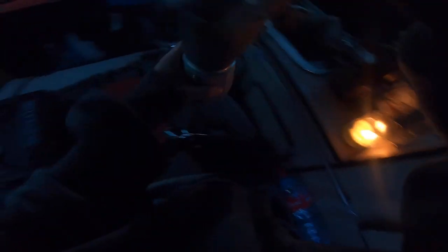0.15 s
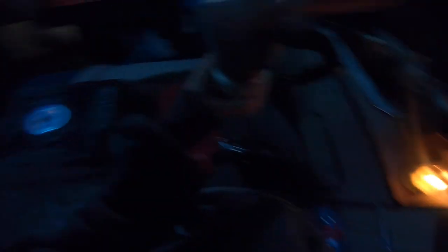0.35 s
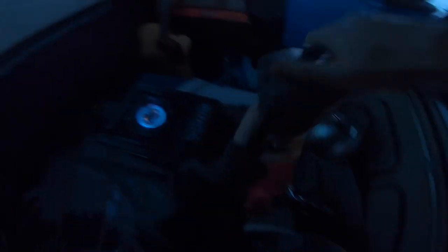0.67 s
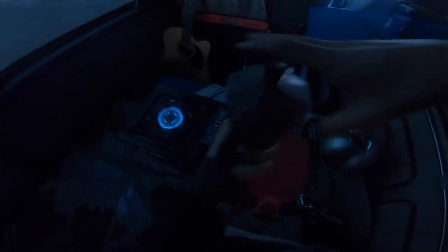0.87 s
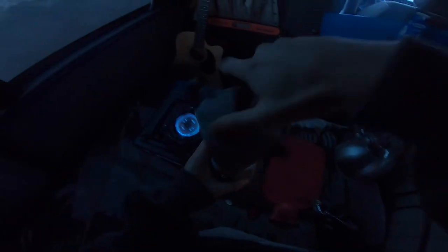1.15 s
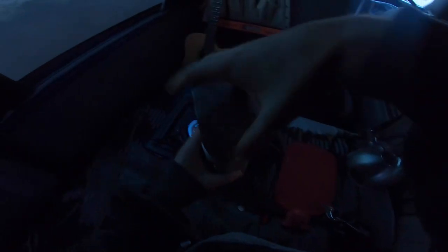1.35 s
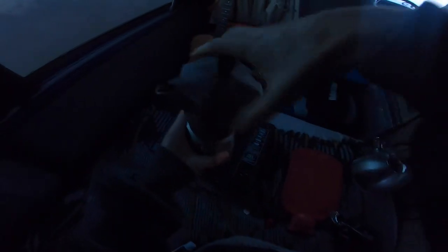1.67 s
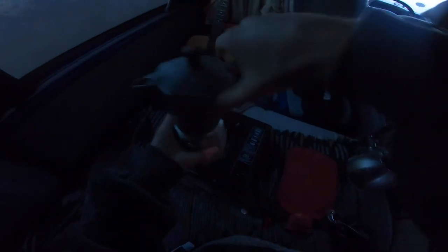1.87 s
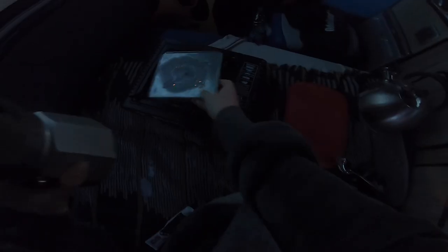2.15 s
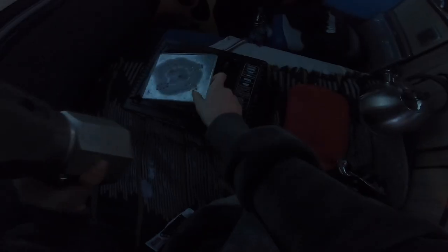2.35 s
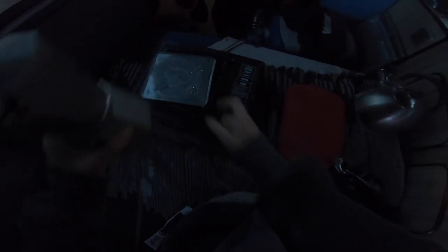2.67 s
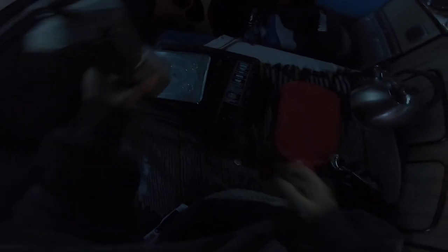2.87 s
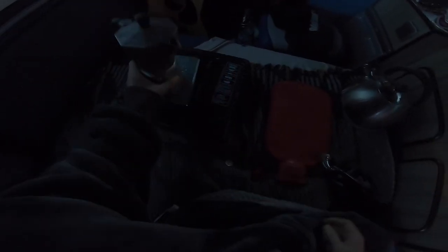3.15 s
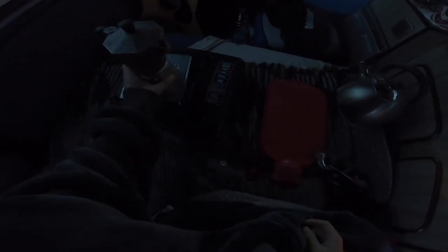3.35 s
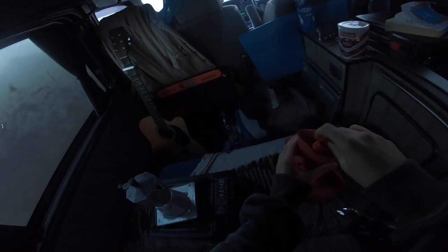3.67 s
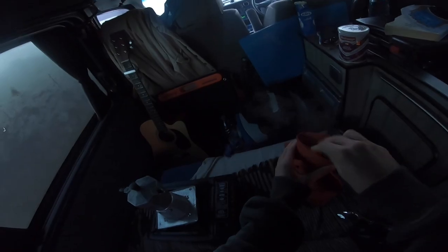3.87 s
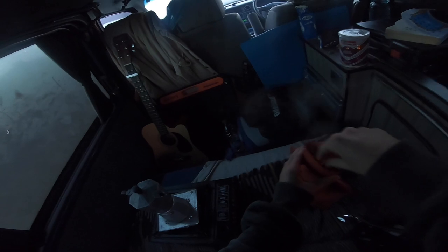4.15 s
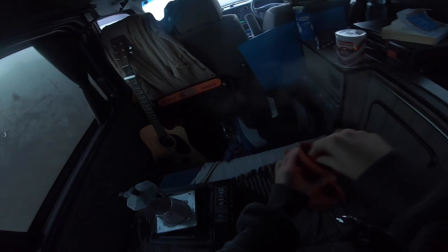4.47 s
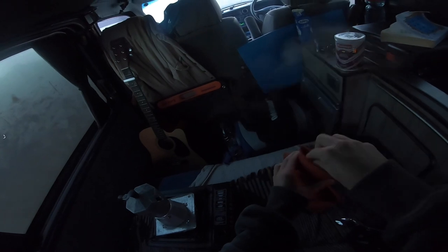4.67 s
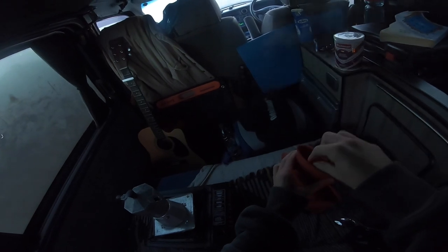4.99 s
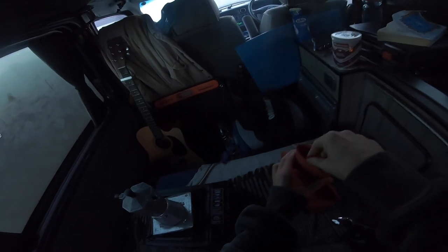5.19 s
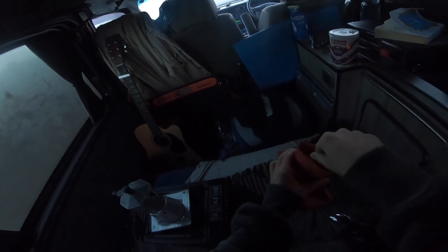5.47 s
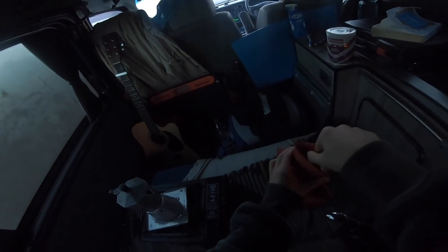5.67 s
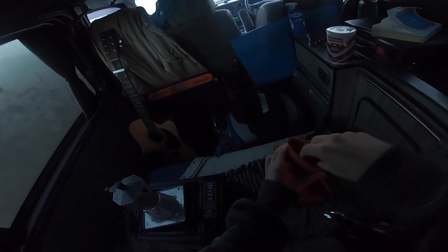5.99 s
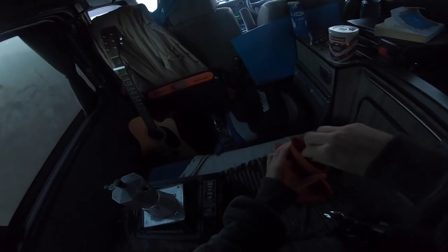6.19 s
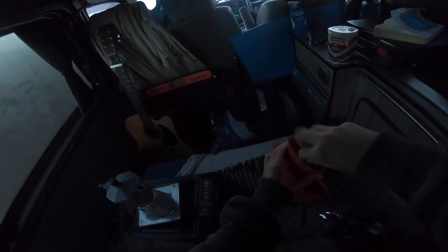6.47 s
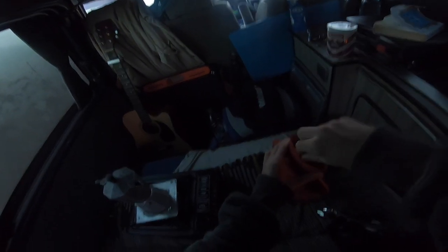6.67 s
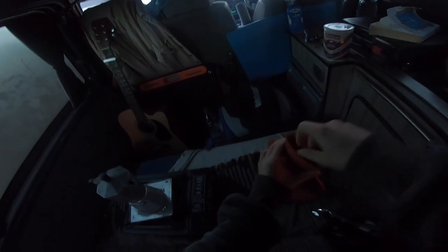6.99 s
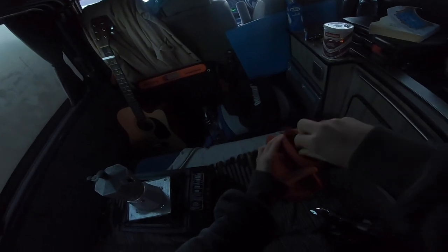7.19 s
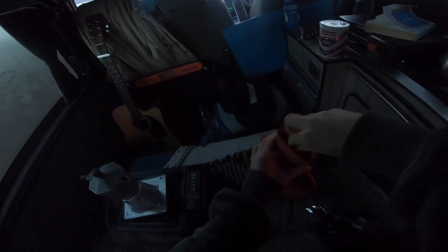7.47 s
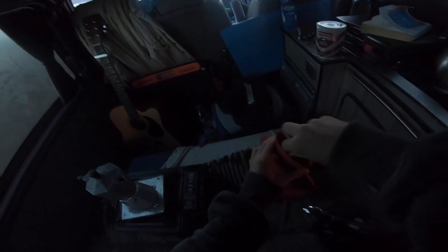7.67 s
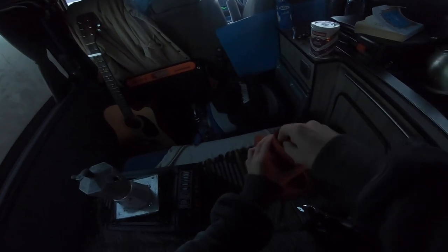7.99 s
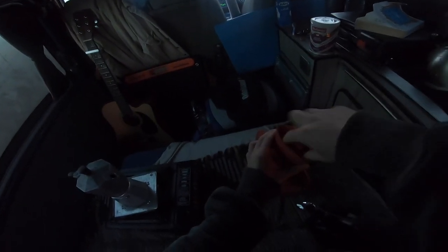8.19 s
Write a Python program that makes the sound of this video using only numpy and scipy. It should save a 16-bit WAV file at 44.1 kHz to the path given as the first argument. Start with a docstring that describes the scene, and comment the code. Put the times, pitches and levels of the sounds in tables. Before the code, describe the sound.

Sharp little metal knocks and gritty thread turns come first, with gas hissing faintly and steam whistling thinly for moments. Then a loud scrape of thin sheet metal leaves a shimmering ring, and a pot clunks down onto it with a short scrape. Abruptly it is much quieter: a stopper turned into a rubber bottle ticks irregularly, fingers rub softly, cabin hum beneath. Near wearable stereo microphone, small deadened van interior, almost no echo.

```python
"""Coffee pot, stove and hot-water bottle in a van

Inside a small van a metal coffee pot is screwed together beside a hissing gas ring with a thin whistle of steam.
A sheet-metal stove is dragged and rings, and the pot is set down on it; later a plastic stopper is turned,
ticking, into a rubber hot-water bottle, over the quiet hum of the cabin. Clicks and frictional grains force
modal resonators and coloured filters; flame and hum are filtered noise, the whistle a sine of varying pitch.
"""
import sys
import numpy as np
from scipy import signal
from scipy.fft import rfft, irfft
from scipy.io import wavfile

SR = 44100
rng = np.random.default_rng(int(sys.argv[2]) if len(sys.argv) > 2 else 0)


def to_wav(sig):
    """Store sig (one row per channel, or 1-D mono) as 16-bit WAV at the path in sys.argv[1].

    Samples outside -1..1 are clipped; the rate is SR.
    """
    pcm = np.clip(np.atleast_2d(sig), -1, 1) * 32767
    pcm = np.round(pcm).astype(np.int16)
    wavfile.write(sys.argv[1], SR, pcm.T)  # frames by channels


def volts_from_db(level):
    """Convert decibel levels to linear amplitude ratios."""
    exponent = np.asarray(level, float) / 20
    return 10 ** exponent


N = 367787   # length [samples]
BOTTLE_FROM_S = 3.7   # the flame stops and the bottle begins

# vibration modes of the pot wall: (frequency [Hz], coupling [dB], t60 [s])
POT_MODES = [(1728, -14, 0.035), (2137, -3, 0.057), (3165, 0, 0.039), (3483, -22, 0.065), (3693, -18, 0.08),
             (4441, -21, 0.045), (4743, -20, 0.047), (5448, -25, 0.05), (5911, -31, 0.089),
             (6901, -27, 0.04), (7784, -36, 0.068)]
# spectral envelope of the stove's contacts and sheet: (frequency [Hz], gain [dB])
STOVE_COLOUR = [(290, -44.5), (500, -8.5), (657, -18), (1010, -3.5), (1170, -18.5), (1310, -1.5),
                (1650, -6.5), (1880, 3), (2200, -4), (3190, 0), (4250, -8), (9650, -21.5), (12000, -35.5),
                (15500, -46.5)]


def rms_one(x):
    """Normalization: mean power becomes 1."""
    return x / np.sqrt(np.mean(x ** 2) + 1e-20)


def in_time(rows):
    """Linear interpolation: the columns of a curve at every sample."""
    s, *columns = np.transpose(rows)
    return [np.interp(np.arange(N) / SR, s, c) for c in columns]


def cut(x, hz, kind):
    """Butterworth filtering of order 2: a maximally flat passband."""
    return signal.sosfilt(signal.butter(2, np.clip(hz, 10, 19000), kind, fs=SR, output="sos"), x)


def colour(x, spectrum, size=4096):
    """Minimum-phase filtering: white noise of rms 1 leaves with rms 1 between 1 and 5 kHz."""
    hz = np.arange(size // 2 + 1) * SR / size
    corner_hz, gain_db = np.transpose(spectrum)
    log_gain = np.log(volts_from_db(np.interp(np.log(hz + 1), np.log(corner_hz), gain_db)))
    # folding the cepstrum onto positive times makes the response causal
    cepstrum = irfft(log_gain)
    cepstrum[1:size // 2] *= 2
    cepstrum[size // 2 + 1:] = 0
    response = np.exp(rfft(cepstrum))
    power = np.mean(np.abs(response) ** 2 * (hz > 1000) * (hz < 5000))
    impulse = irfft(response)[None] / np.sqrt(power)
    return signal.oaconvolve(x, impulse, axes=1)[:, :N]


def drift(rate):
    """Low-passed random fluctuation of rms 1, with its cutoff at the rate [Hz]."""
    return rms_one(cut(rng.standard_normal(N + SR), rate, "low")[SR:])


def wide_noise(alike):
    """Partial coherence: white noise whose two sides correlate by the given amount."""
    mid, side = rng.standard_normal((2, N))
    alike = np.clip(alike, 0, 1)
    return np.sqrt((1 + alike) / 2) * mid + np.sqrt((1 - alike) / 2) * side * np.array([[1], [-1]])


def shaking():
    """Transient envelope: each bump swells exponentially, holds and dies over a faint floor."""
    # bumps of the van floor: (time of peak [s], hold [s], level [dB])
    bump_rows = [(0.371, 0, -69), (.83, 0.057, -65), (1.21, 0, -81), (1.55, 0.04, -77),
                 (1.94, 0.049, -55.5), (2.29, .04, -45.5), (2.56, 0.017, -42.5), (3.34, 0.09, -43),
                 (3.58, 0.0017, -43.5), (4.39, 0, -68), (4.53, 0, -66), (5.18, 0.0077, -73),
                 (5.53, 0.0031, -72.5), (6.74, 0, -68), (8.04, 0.019, -53)]
    rise_db_per_s, fall_db_per_s, rest_db = 329, 280, -98.5
    t = np.arange(N) / SR
    level = volts_from_db(rest_db)
    for s, held, db in bump_rows:
        rise = rise_db_per_s * np.maximum(s - t, 0)
        fall = fall_db_per_s * np.maximum(t - s - held, 0)
        level = level + volts_from_db(db - rise - fall)
    return level


def cabin():
    """Filtered noise: hum with narrow bands, low bumps through the floor and a drone from outside."""
    # spectral envelope of the hum: (frequency [Hz], gain [dB])
    hum_colour = [(15, -33.5), (25, -1.5), (60, 0.5), (96, -16.5), (155, 2.5), (301, 0), (554, -19.5),
                  (761, -5.5), (1050, -20.5), (1970, -6), (2500, -20.5), (3930, -10), (6670, -21.5),
                  (9410, -19), (14000, -45)]
    # narrow bands in the hum: (centre [Hz], width [Hz], level among the bands [dB])
    hum_bands = [(746, 90, -3), (1560, 39, -1.5), (1810, 260, 3), (2980, 38, -4.5), (3300, 170, -1.5),
                 (3960, 71, -4.5)]
    hum_db, drone_hz, drone_db = -68.5, 46, -78
    hum = rms_one(colour(wide_noise(alike=0.27), hum_colour))
    noise = wide_noise(alike=0.44)
    bands = sum(volts_from_db(db) * rms_one(cut(noise, [hz - width / 2, hz + width / 2], "band"))
                for hz, width, db in hum_bands)
    hum = hum + volts_from_db(-12 + 3.0 * drift(18)) * bands
    bumps = rms_one(cut(cut(wide_noise(alike=0.84), [48, 95], "band"), [40, 115], "band"))
    drone = rms_one(cut(wide_noise(alike=.9), [drone_hz - 3, drone_hz + 3], "band"))
    return volts_from_db(hum_db) * hum + shaking() * bumps + volts_from_db(drone_db) * drone


def flame():
    """Broadband turbulence noise: the gas hisses with a fluctuating level until the bottle begins."""
    # mean level of the hiss: (time [s], level [dB])
    flame_level = [(0, -56), (.2, -58.5), (.5, -59.5), (.8, -66), (.95, -69.5), (1.4, -65.5), (1.5, -69.5),
                   (1.8, -68.5), (2.1, -58.5), (2.25, -58), (3.2, -66), (3.6, -60.5)]
    # spectral envelope: (frequency [Hz], gain [dB])
    flame_colour = [(90, -42), (140, -12), (175, -13), (300, 0), (565, -11.5), (1080, -10), (2350, -13),
                    (4070, -16.5), (5310, -20.5), (6120, -17), (7060, -32.5), (8480, -31), (13000, -73.5)]
    burning = np.arange(N) < BOTTLE_FROM_S * SR
    level = volts_from_db(in_time(flame_level)[0] + 2.8 * drift(8))
    return level * burning * colour(wide_noise(alike=0.31), flame_colour)


def whistle():
    """Frequency and amplitude modulation: a thin sine of steam wavers in pitch and strength."""
    # puffs of steam: (start [s], end [s], mean level [dB])
    puff_rows = [(0, .18, -63), (.47, .78, -66)]
    # mean pitch: (time [s], frequency [Hz])
    pitch_curve = [(0, 6450), (.04, 6400), (.075, 6050), (.11, 5940), (.14, 6620), (.18, 6300), (.49, 6070),
                   (.55, 5900), (.65, 5930), (.78, 5870)]
    fade_s = 0.026
    t = np.arange(N) / SR
    puffs = np.zeros(N)
    for start, end, db in puff_rows:
        since_start = t - start + (start == 0)   # a puff from time zero is already full
        puffs += volts_from_db(db) * np.clip(np.minimum(since_start, end - t) / fade_s, 0, 1)
    hz = in_time(pitch_curve)[0] + 130 * drift(200)
    phase = 2 * np.pi * np.cumsum(hz) / SR
    return puffs * volts_from_db(3.0 * drift(15) + 3.0 * drift(80)) * np.sin(phase)


def ring(force, modes, fickle_db=0.0):
    """Modal superposition: a force drives damped resonators, each with a randomly varying coupling."""
    out, busy = np.zeros_like(force), np.flatnonzero(np.any(force != 0, axis=0))
    here = slice(busy[0], busy[-1] + SR // 2)
    force = force[:, here]
    length = force.shape[1]
    for hz, level_db, t60 in modes:
        r, w = volts_from_db(-60 / (t60 * SR)), 2 * np.pi * hz / SR   # pole radius and angle
        # the contact point wanders: a new coupling every 1024 samples
        caught = volts_from_db(fickle_db * rng.normal(0, 1, length // 1024 + 1))
        caught = np.repeat(caught, 1024)[:length]
        side_db = rng.normal(0, 1) * np.array([[1], [-1]])
        driven = volts_from_db(level_db + side_db) * caught * force
        out[:, here] += signal.lfilter([0, np.sin(w)], [1, -2 * r * np.cos(w), r * r], driven + 1e-18)
    return out


def blows(rows, t60, rattle_db):
    """Impulsive excitation (main, hollow, bright, ringing): a click, then an exponentially dying rattle."""
    # rows: (time [s], click [dB], hollow, bright and ringing drive re click [dB], left minus right [dB])
    forces, t = np.zeros((4, 2, N + SR)), np.arange(SR // 8) / SR
    for s, peak_db, *parts_db, pan_db in rows:
        blow = volts_from_db(rattle_db - 60 * t / t60) * rng.standard_normal(len(t))
        blow[0] = 1
        sides = volts_from_db(peak_db + pan_db * np.array([[.5], [-.5]]))
        parts = volts_from_db(np.array([0, *parts_db]))[:, None, None]
        start = round(s * SR)
        forces[:, :, start:start + len(t)] += parts * sides * blow
    return forces[:, :, :N]


def strokes(gains, per_s, spread_db, pan_db, slips_per_s, slip_db):
    """Stick-slip friction (main, hollow, bright): dense grains, with slips that the bright part ignores."""
    sizes = volts_from_db(spread_db * np.minimum(rng.exponential(1, N), 5)) * rng.choice([-1, 1], N)
    grains = sizes * (rng.random(N) < per_s * volts_from_db(3.0 * drift(40)) / SR)
    slips = (rng.random(N) < slips_per_s / SR) * rng.random(N)
    slips = signal.lfilter([1], [1, -np.exp(-1 / (0.0032 * SR))], slips)   # time constant 3.2 ms
    jerky = rms_one(grains * (1 + volts_from_db(slip_db) * slips))
    parts = gains * [jerky, jerky, rms_one(grains)]
    return parts[:, None] * volts_from_db(pan_db * np.array([[.5], [-.5]]))


def spread_out(x, share):
    """Multipath decorrelation: a share of each side arrives over two later paths of its own."""
    share = np.clip(share, 0, 1)
    late = np.array([np.roll(x[0], 23), -np.roll(x[1], 41)])   # delays in samples
    later = np.array([-np.roll(x[0], 67), np.roll(x[1], 97)])
    return np.sqrt(1 - share) * x + np.sqrt(share / 2) * (late + later)


def body(forces, spectrum, hollow, hollow_db, bright_db):
    """Source-filter radiation: crack and hiss take the object's colour, a cavity resonates as the thud."""
    main, low, bright = forces[:3]
    bright = volts_from_db(bright_db - 8) * spread_out(bright, share=0.81)
    # the minus keeps both sides of the order-2 crossover in phase
    crack = cut(main, 5000, "low") - cut(bright, 5000, "high")
    thud = ring(cut(low, 830, "low"), hollow, fickle_db=3.5)
    for _ in range(3):
        thud = cut(thud, 140, "high")
    return colour(crack, spectrum) + volts_from_db(hollow_db) * thud


def twisting():
    """Friction envelope: each turn of the thread swells, holds and eases; thud and hiss follow the rub."""
    # turns: (start [s], full [s], easing [s], end [s], full rub before the mix [dB])
    turns = [(0.178, 0.255, .325, 0.51, -41), (0.591, 0.736, 0.73, 0.81, -35.5),
             (.82, .835, 0.85, .875, -56.5), (1.073, 1.158, 1.244, 1.35, -39.5),
             (1.519, 1.553, 1.636, 1.673, -37)]
    rise_db, fall_db = 31.5, 31   # below full at start and end
    hollow_db, bright_db, bright_follows = -2.5, -13.5, .7   # parts re full rub; share of the swing
    gains, t, lumps = np.zeros((3, N)), np.arange(N) / SR, 1.3 * drift(25)
    for *times, full_db in turns:
        swing = np.interp(t, times, [-rise_db, 0, 0, -fall_db])
        parts_db = np.array([swing, swing + hollow_db + lumps, bright_follows * swing + bright_db])
        gains += (t >= times[0]) * (t < times[-1]) * volts_from_db(full_db + parts_db)
    return gains


def pot():
    """Impact and friction excitation: the halves knock, the thread is twisted and the wall rings briefly."""
    # knocks before the mix: (time [s], click [dB], hollow part re click [dB], bright part re click [dB],
    # left minus right [dB])
    pot_knocks = [(0.0483, -49, 10, -4, -2), (0.146, -38, 12.5, -1.5, -1.5), (0.212, -34, 5, -19, 3.5),
                  (0.27, -30.5, 4.5, -23, 12.5), (0.3312, -15.5, -13.5, -2, 1), (0.3554, -9, 2, -37, 3.5),
                  (0.413, -51.5, 10, -20, 2), (0.423, -10, -16, -22, 6.5), (0.5251, -33, 4, -11, 1.5),
                  (0.6045, -40, 22.5, 6, -1), (0.7459, -20, 4.5, -22, -3), (0.848, -31.5, 0.5, 3, -1),
                  (0.8704, -29.5, 7, -5, -1), (0.8823, -12.5, -3.5, -12.5, -2.5), (0.95, -44, -9, -30, 0),
                  (1.0843, -41, 10, 1, -2.5), (1.1117, -23.5, -0.5, -27, 2.5), (1.1641, -16, -6, -29, 1.5),
                  (1.1721, -28, 13.5, -21, -1.0), (1.1877, -17, 3.5, -29, -2.5), (1.2304, -19, -9, -29, 2),
                  (1.3284, -43, 3.5, 0, -4), (1.4165, -23, -1, -35, 0), (1.508, -12, -5.5, -26, 0.5),
                  (1.5655, -8.5, -13.5, 3, -1), (1.634, -32, 5, -20, -3), (1.6691, -26.5, -4.5, -29, 4),
                  (1.7439, -50.5, 11, -24, -3), (1.8402, -12, -8.5, -5, -1.5), (1.865, -8, -8, -4.5, 2.0),
                  (1.8978, -6.5, -37, -23, -2.5), (1.906, -8.5, -5, 11, 0.5), (1.954, -11, -5, 3.5, 1.5),
                  (2.046, -12.5, -20, 4, 2)]
    # spectral envelope of the contacts: (frequency [Hz], gain [dB])
    pot_colour = [(70, -52.5), (290, -34.5), (500, -3.5), (1390, -4), (2100, -2), (2880, -4), (3180, -6.5),
                  (3990, -13), (6030, -11), (6960, -17), (9650, -24), (15000, -51)]
    # cavity modes: (frequency [Hz], coupling [dB], t60 [s])
    cavity = [(355, -3.5, 0.037), (397, -10.5, 0.03), (182, -12.5, 0.042)]
    ring_db, ring_spread_db = -18, 1.5   # ringing drive re click
    soft_loss = 0.58   # dB of ring lost per dB of hollow part above the click
    rows = []
    for s, peak_db, hollow_db, bright_db, pan_db in pot_knocks:
        ringing_db = ring_db - soft_loss * max(hollow_db, 0) + ring_spread_db * rng.normal()
        rows.append((s, peak_db, hollow_db, bright_db, ringing_db, pan_db))
    knocks = blows(rows, t60=0.04, rattle_db=-21)
    twists = strokes(twisting(), per_s=4100.0, spread_db=1.5, pan_db=0.0, slips_per_s=80.0, slip_db=9)
    knock = body(knocks, pot_colour, cavity, hollow_db=-5.5, bright_db=14.5)
    knock += ring(knocks[3], POT_MODES, fickle_db=3.0)
    twist = body(twists, pot_colour, cavity, hollow_db=-16.0, bright_db=15.5)
    twist += volts_from_db(-33) * ring(twists[0], POT_MODES, fickle_db=3.0)
    return volts_from_db(0.5) * knock + volts_from_db(1.3) * twist


def dragging():
    """Friction envelope: the rub and treble of each stroke are interpolated, silent between strokes."""
    # strokes over the stove, each a curve before the mix: (time [s], rub [dB], treble [dB])
    drag_curves = [
        [(2.253, -16.5, -20), (2.277, -26.5, -35.5), (2.345, -20, -39), (2.37, -25.5, -35), (2.41, -29, -40),
         (2.452, -46.5, -54.5)],
        [(2.456, -30, -49.5), (2.5, -35.5, -51), (2.512, -30.5, -45.5)],
        [(2.516, -19.5, -26), (2.572, -21, -28), (2.662, -32.5, -26), (2.758, -44.5, -52), (2.898, -59.5, -97),
         (3.078, -58, -102), (3.2, -72.5, -93)],
        [(3.315, -22, -34.5), (3.325, -17.5, -27), (3.392, -41, -45), (3.415, -40, -48), (3.42, -32, -45),
         (3.505, -37.5, -48)],
        [(3.513, -24, -35), (3.567, -25, -37.5), (3.643, -72, -82)],
    ]
    hollow_db, hollow_follows = -30, .55   # hollow part: level at a rub of 0 dB, share of the swing
    gains, t = np.zeros((3, N)), np.arange(N) / SR
    for rows in drag_curves:
        rub, treble = in_time(rows)
        levels = volts_from_db(np.array([rub, hollow_db + hollow_follows * rub, treble]))
        gains += (t >= rows[0][0]) * (t < rows[-1][0]) * levels
    return gains


def sheet(force, t60, count):
    """High modal density: a crowd of weak modes of thin sheet metal, the higher ones tending to die sooner."""
    hz, spread = rng.uniform(600, 11000, (count, 1)), rng.normal(0, 1, (count, 2))
    phase = rng.random((2, count, 1))
    t = np.arange(SR // 2) / SR
    mode_t60 = t60 * np.exp(0.3 * spread[:, 1:]) * (2000 / hz) ** 0.437
    fading = volts_from_db(2.1 * spread[:, :1] - 60 * t / mode_t60)
    response = np.sum(fading * np.sin(2 * np.pi * (hz * t + 0.19 * phase)), axis=1)
    return colour(signal.oaconvolve(force, response, axes=1)[:, :N], STOVE_COLOUR)


def stove():
    """Modal ringing and damping: the dragged sheet rings long; as the pot lands, it rings over a damped sheet."""
    # knocks before the mix: (time [s], click [dB], hollow part re click [dB], bright part re click [dB])
    stove_knocks = [(2.2532, -6.5, -33, 0), (2.4548, -14.5, -34.5, -28), (2.5169, -1.5, -16, -5),
                    (3.308, -22, -15, -20.5), (3.315, -1, -22.5, -28.5), (3.4186, -22, -20.5, -16),
                    (3.5114, -13.5, -8.5, -27), (3.537, -8.5, -33, -13.5)]
    # sheet modes: (frequency [Hz], coupling before the correction below [dB], t60 before its cap [s])
    sheet_modes = [(345, -15, 2.1), (947, -14, 0.79), (1340, -14, 1.1), (1400, -16, 1.5), (1604, -14, 0.37),
                   (1814, 0, 0.35), (1884, -2, 1.1), (2013, -11, 0.55), (2412, -15, 1.2), (2460, -14, 0.67),
                   (2525, -2, 0.3), (3004, -12, 0.84), (3354, -19, 1.6), (3451, -3, 0.57), (3655, -6, 0.7),
                   (3725, -15, 1.2), (3779, -6, 0.28), (3951, -20, 0.95), (3989, -12, 0.72),
                   (4581, -8, 0.38), (4651, -28, 2.2), (4915, -14, 0.54), (5410, -13, 0.31),
                   (5599, -9, 0.31), (5965, -21, 0.46), (6455, -23, 0.45), (6600, -18, 0.54),
                   (6718, -16, 0.54), (7784, -17, 0.32), (8597, -32, 0.71), (8737, -14, 0.21)]
    # hollow modes: (frequency [Hz], coupling [dB], t60 [s])
    pan_modes = [(491, 5.5, 0.017), (714, -10, 0.036), (154.15, -4.5, 0.074)]
    # gain of the free ring: (time [s], gain [dB])
    ring_gain = [(2.25, -3), (2.45, -6), (2.62, -2.5), (2.75, 0), (3.12, -2), (3.2, -7.5)]
    ring_db, pan_db = 2, 4.5   # ringing drive re click; left minus right
    knocks = blows([(*row, ring_db, pan_db) for row in stove_knocks], t60=0.036, rattle_db=-20)
    drags = strokes(dragging(), per_s=3500.0, spread_db=1.5, pan_db=2.5, slips_per_s=150.0, slip_db=-3)
    knock = body(knocks, STOVE_COLOUR, pan_modes, hollow_db=-9.0, bright_db=2.5)
    drag = body(drags, STOVE_COLOUR, pan_modes, hollow_db=-17.5, bright_db=17)
    force, loaded = knocks[3] + drags[0], np.arange(N) > 3.3 * SR
    # steady rubbing builds up the lasting modes most, so they are coupled more weakly
    coupled = [(hz, level_db - 10 * np.log10(min(t60, .35)), min(t60, 1.5))
               for hz, level_db, t60 in sheet_modes]
    free_force, landing_force = force * ~loaded, force * loaded
    free = volts_from_db(-47.5) * ring(cut(free_force, 5000, "low") * ~loaded, coupled)
    free += volts_from_db(-54.5) * sheet(free_force, t60=0.27, count=150)
    landing = volts_from_db(-32.5) * ring(landing_force, POT_MODES, fickle_db=4.0)
    landing += volts_from_db(-56.5) * sheet(landing_force, t60=0.11, count=90)
    return volts_from_db(0.5) * knock + volts_from_db(-3.5) * drag + volts_from_db(in_time(ring_gain)[0]) * free + landing


def bottle():
    """Impulse and friction excitation: the stopper ticks, each at its own pitch; fingers rub the rubber."""
    # ticks before the mix: (time [s], click [dB], hollow part re click [dB], pitch [Hz],
    # left minus right [dB])
    stopper_ticks = [(3.7072, -45.5, -34, 3800, 3.5), (3.742, -36, -39, 3170, 8),
                     (3.9417, -49, 0.5, 1630, -8), (4.0243, -34, -13, 747, -1),
                     (4.049, -48.5, -4, 1540, -10), (4.2947, -44.5, -9.5, 845, -11),
                     (4.3365, -23.5, -20, 2670, -4), (4.4611, -34, -6, 1580, -4),
                     (4.6904, -43, -19, 830, -14), (4.8673, -38, -34, 1520, -4.5),
                     (5.0206, -28.5, -23, 2010, -3), (5.0597, -41, -9.5, 2600, -6),
                     (5.169, -35.5, -5.5, 2070, -5), (5.3579, -39, -18, 2030, -6),
                     (5.4291, -42, -23.5, 2010, 0.5), (5.5107, -24.5, -18.5, 2830, -3.5),
                     (5.616, -49.5, -25, 754, -6), (6.2096, -44, -24.5, 1920, -8),
                     (6.4458, -51.5, -1, 1790, -10), (6.686, -34, -14, 1930, -3),
                     (6.7266, -30.5, -16, 720, -3.5), (7.1011, -38, -12, 1600, -5),
                     (7.257, -40, -31, 814, -4), (7.3034, -50, -18, 1810, 0.5),
                     (7.4738, -45.5, -26, 1800, -2), (7.5175, -43.5, -38, 1900, -0.5),
                     (7.5988, -41, -14, 1810, -3), (7.8774, -34.5, -11, 1970, -3.5),
                     (7.9194, -45.5, -20, 1850, -8), (7.9963, -33, -6, 1930, -3.5)]
    # fingers on the rubber, before the mix: (time [s], rub [dB], hollow part [dB])
    rubber = [(3.69, -60.5, -77), (3.9, -67.5, -66.5), (4.06, -64, -65.5), (4.45, -65.5, -65),
              (4.69, -54.5, -59), (4.82, -64.5, -68), (5.2, -76.5, -77), (5.56, -76, -88),
              (5.8, -86.5, -95.5), (5.9, -71, -71.5), (6.3, -67.5, -72), (6.4, -58, -66), (6.58, -59, -72),
              (6.78, -64, -61), (7.09, -70, -84), (7.31, -78, -90), (7.5, -64.5, -85), (7.62, -77, -83),
              (7.75, -63, -81.5), (7.84, -75, -86), (7.93, -59, -63.5), (8.05, -68, -63),
              (8.23, -65.5, -71.5), (8.34, -80, -77.5)]
    # spectral envelope of the contacts: (frequency [Hz], gain [dB])
    bottle_colour = [(290, -41), (500, -17.5), (811, 2.5), (935, -7), (1560, -0.5), (2680, -5.5),
                     (2960, -7), (5700, -12), (6760, -19.5), (9380, -22.5), (15000, -33.5)]
    # hollow modes: (frequency [Hz], coupling [dB], t60 [s])
    bottle_modes = [(296, 0, 0.033), (205, -14, 0.051), (403, -15, 0.015)]
    tick_bright_db, tick_ring_db, tick_t60_s = -24, -7.5, .008   # drives re click; decay of the pitch
    faint_count, faint_db, faint_hz = 14, -52, 1850   # faint ticks at random times, scattered about these
    hiss_db, hiss_follows = -45.5, 0.49   # hiss: level at a rub of 0 dB, share of the swing
    rows = list(stopper_ticks)
    for _ in range(faint_count):
        a, b, c = rng.standard_normal(3)
        s = BOTTLE_FROM_S + rng.random() * (N / SR - BOTTLE_FROM_S - .1)
        rows.append((s, faint_db + 3 * a, -15, faint_hz * (1 + 0.16 * b), 5 * c))
    ticks = blows([(s, db, low, tick_bright_db, tick_ring_db, pan) for s, db, low, _, pan in rows],
                  t60=0.04, rattle_db=-23)
    tick = body(ticks, bottle_colour, bottle_modes, hollow_db=-4.5, bright_db=-1.5)
    for s, _, _, hz, _ in rows:
        start = round(s * SR)
        here = slice(start, start + SR // 40)
        tick[:, here] += ring(ticks[3][:, here], [(hz, 0, tick_t60_s)])
    rub_db, hollow_db = in_time(rubber)
    levels = np.array([rub_db, hollow_db, hiss_db + hiss_follows * rub_db + 1.7 * drift(6)])
    gains = (np.arange(N) > BOTTLE_FROM_S * SR) * volts_from_db(levels)
    rubs = strokes(gains, per_s=3000.0, spread_db=2.0, pan_db=-0.5, slips_per_s=40.0, slip_db=4.5)
    rub = body(rubs, bottle_colour, bottle_modes, hollow_db=-12.5, bright_db=22.0)
    return volts_from_db(3) * tick + volts_from_db(-5.5) * rub


def van(x):
    """Reverberation of a padded cabin: dense short echoes, other ones on each side; the bright die first."""
    t60_s, bright_t60_s, echo_db = 0.082, 0.024, -28.5
    t = np.arange(SR // 3) / SR
    noise = rng.standard_normal((2, len(t))) * (t > .001)
    echoes = cut(noise, 3500, "low") * volts_from_db(-60 * t / t60_s)
    echoes += volts_from_db(11) * cut(noise, 2500, "high") * volts_from_db(-60 * t / bright_t60_s)
    return volts_from_db(echo_db) * signal.oaconvolve(cut(x, 400, "high"), echoes, axes=1)[:, :N]


def scene():
    """Superposition: near sounds with their echoes, over flame and cabin noise."""
    near = pot() + stove() + bottle() + whistle()
    return near + van(near) + flame() + cabin()


def ports(x):
    """Long-wave coupling: two ports in one small housing share most of the bass."""
    bass = cut(x, 500, "low")
    return x + .7 * (bass.mean(axis=0) - bass)


def band_limit(x):
    """A steep low-pass at the top of the band."""
    return signal.sosfilt(signal.butter(12, 16020, fs=SR, output="sos"), x)


def record(dry):
    """Microphone response: the housing couples the bass and the treble rolls off."""
    mix = cut(ports(dry), 17500, "low")
    return band_limit(mix)


dry = scene()
out = record(dry)
to_wav(out)
```